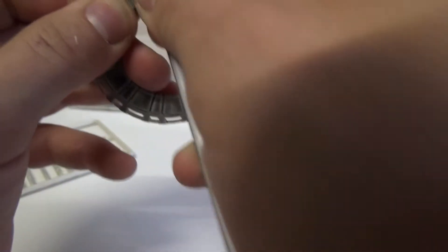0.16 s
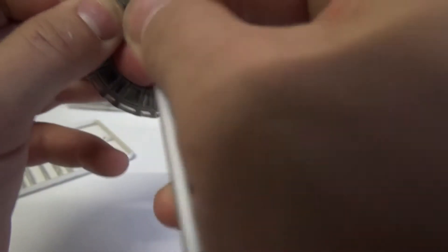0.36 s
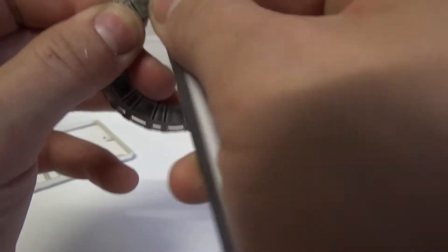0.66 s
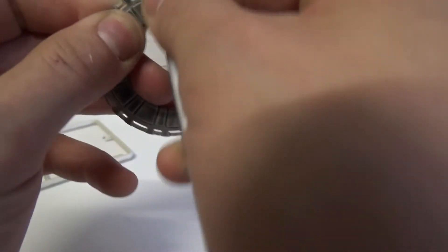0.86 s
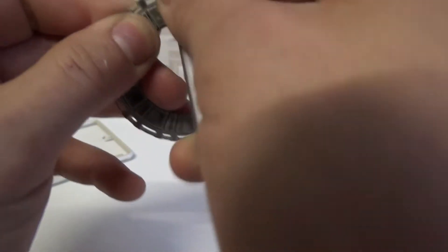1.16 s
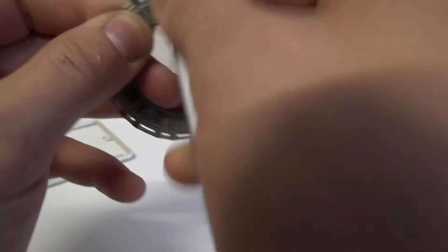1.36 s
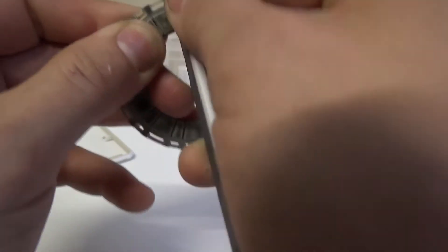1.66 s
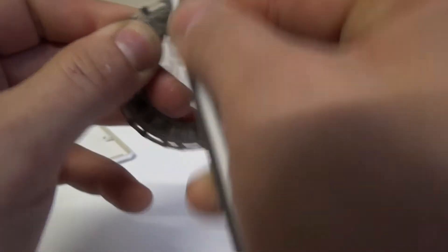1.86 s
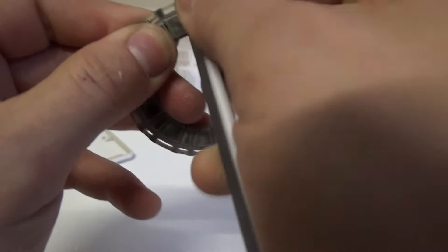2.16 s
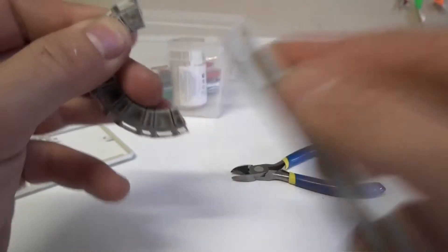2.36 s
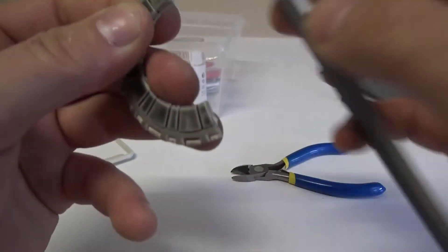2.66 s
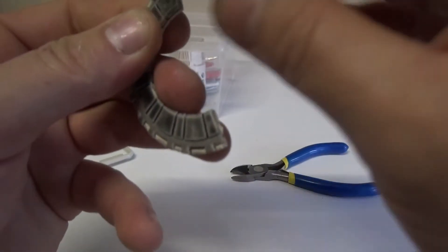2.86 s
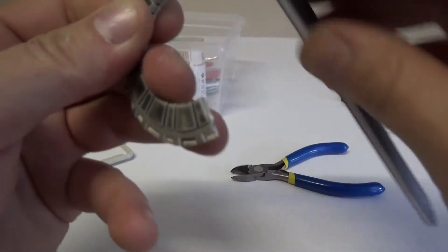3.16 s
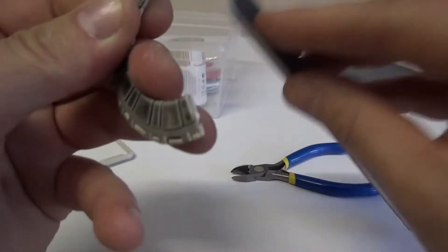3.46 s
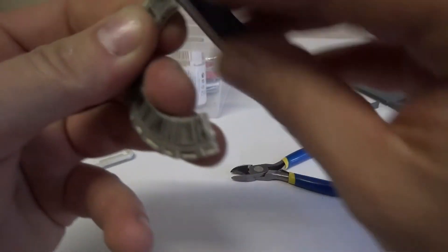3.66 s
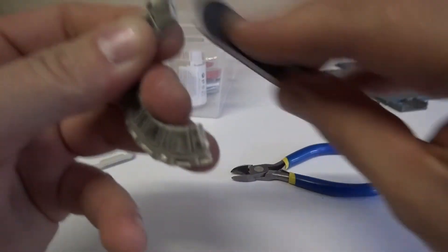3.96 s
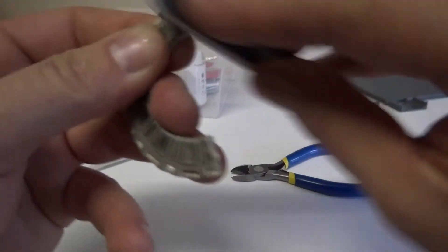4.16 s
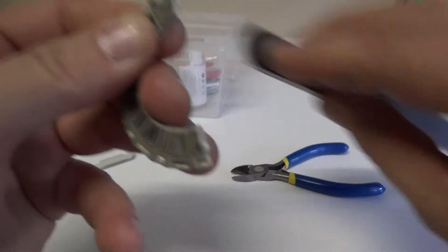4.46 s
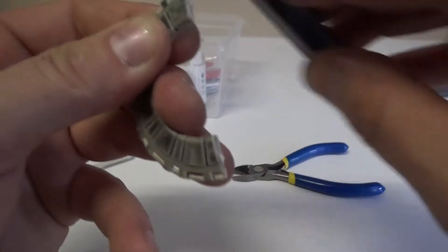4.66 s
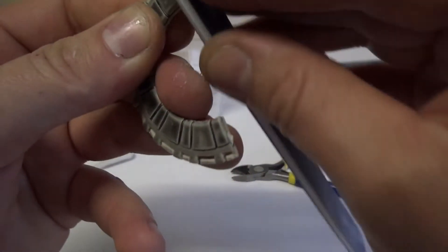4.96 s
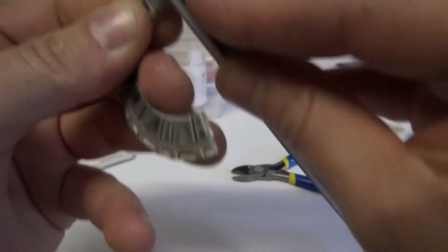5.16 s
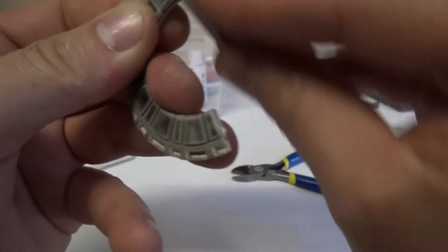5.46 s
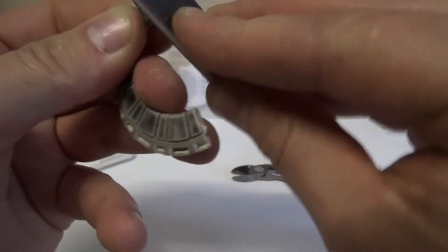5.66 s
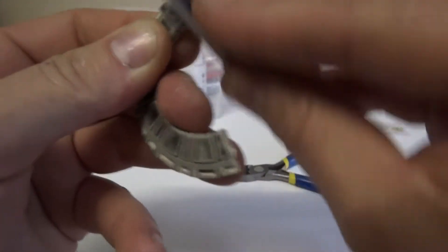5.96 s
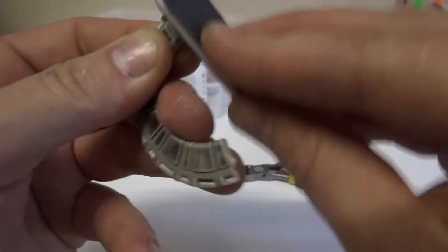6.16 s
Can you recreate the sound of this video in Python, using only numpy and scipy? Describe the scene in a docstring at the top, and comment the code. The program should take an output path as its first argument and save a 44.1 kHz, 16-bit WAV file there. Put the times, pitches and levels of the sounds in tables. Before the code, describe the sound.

A sanding stick works a small plastic model part, close to the microphone and nearly centred. In the first second the strokes are uneven, catching with sharp clicks and a brief stutter. From about 1.1 to 2.4 seconds comes a firm, coarse back-and-forth rasp, about eight strokes a second, with a few more catches. A short break follows, with only a faint rustle of fingers shifting grip. From 3 to 4.5 seconds there are six separate swipes, each landing with a dull tap, brightening quickly and snapping off the edge. Around 5 seconds a small tap starts a lighter run of quick, finely hissing strokes, with one sharp click near 5.9 seconds, lasting until about 6.3 seconds. Soft, low thuds from the arms lie under the strokes. The small room adds a short echo, a faint fan and a low electrical hum.

```python
"""A sanding stick rubs a small plastic model part held in the fingers, close to the microphone.
First come quick back-and-forth strokes, then six swipes that land with a tap and snap off the edge,
then a lighter run. Tiny breaks in the grit make stick and part ring, differently for each grip.
Fingers rustle, the arms thud softly, and a small room with a faint fan and hum echoes the work."""
import sys
import numpy as np
from scipy import signal
from scipy.fft import rfft, irfft, next_fast_len
from scipy.io import wavfile

SR = 44100
rng = np.random.default_rng(int(sys.argv[2]) if len(sys.argv) > 2 else 0)


def persist_wave(psi):
    """Save psi, clipped to +-1, as 16-bit WAV."""
    counts = np.round(np.clip(psi, -1, 1) * 32767).astype(np.int16)
    wavfile.write(sys.argv[1], SR, np.atleast_2d(counts).T)


N = 277830
TIME = np.arange(N) / SR
RING_SIZE = 2048  # samples in one ring
FREQS = np.maximum(np.arange(RING_SIZE // 2 + 1) * SR / RING_SIZE, 1)


def undb(db):
    """Turn decibels into a plain multiplier."""
    return 10 ** (np.asarray(db) / 20)


def unit(x):
    """Scale a sound to an average (rms) level of 1."""
    return x / np.sqrt(np.mean(x ** 2))


def add(track, start_s, sound):
    """Mix a sound into a track."""
    i = max(int(start_s * SR), 0)
    track[i:i + len(sound)] += sound[:max(N - i, 0)]


def colour(x, points):
    """Turn bass and treble up or down along a curve of (Hz, dB) points."""
    hz, db = np.transpose(points)
    size = next_fast_len(len(x))
    f = np.maximum(np.arange(size // 2 + 1) * SR / size, 1)
    gain = undb(np.interp(np.log(f), np.log(hz), db))
    return irfft(rfft(x, size) * gain, size)[:len(x)]


def ring(modes, scatter_db=0, detune=0):
    """An object rings after one tiny knock; the wider a tone, the sooner it dies."""
    power = 1e-9
    for (hz, width, db), (louder, higher) in zip(modes, rng.standard_normal((len(modes), 2))):
        hz = hz * (1 + detune * higher)
        distance = (FREQS - hz ** 2 / FREQS) / width
        power = power + undb(db + scatter_db * louder) ** 2 / (1 + distance ** 2 / 2) ** 2
    # make the ring follow the knock, never come before it
    cepstrum = irfft(np.log(power) / 2)
    cepstrum[1:RING_SIZE // 2] *= 2
    cepstrum[RING_SIZE // 2 + 1:] = 0
    response = irfft(np.exp(rfft(cepstrum)))
    return response / np.linalg.norm(response)


def grit(speed, grains_per_s, judder_db, judder_hz):
    """Tiny breaks come thicker at speed, and in bunches as the stick grips and slips."""
    n = len(speed)
    chance = rng.random(SR // 4)[:n]
    push, slips = rng.standard_normal((2, SR // 4))[:, :n]
    grains = (chance < grains_per_s * speed / SR) * push
    judder = np.interp(np.arange(n) / SR * judder_hz, np.arange(n), slips)
    return unit(grains * undb(judder_db * judder))


def rub(force, body):
    """The touching point moves along the stick, so the ring changes during a stroke."""
    travel = np.linspace(0, 1, len(force))
    first, last = [ring(body, scatter_db=1, detune=.02) for _ in range(2)]
    return signal.fftconvolve(force * (1 - travel), first) + signal.fftconvolve(force * travel, last)


def crack(body, decay_s, crumble):
    """One sharp release, then a brief crumble of grit."""
    t = np.arange(RING_SIZE // 4) / SR
    force = crumble * rng.standard_normal(len(t)) * np.exp(-t / decay_s)
    force[0] = 1
    sound = signal.fftconvolve(force, ring(body))
    return sound / np.linalg.norm(sound) * np.sqrt(.0002 * SR)  # the energy of a 0.2 ms pulse


def clicks(events, body, gain_db, decay_s, crumble):
    """An edge lets go of the stick: one crack for each (seconds, dB) event."""
    out = np.zeros(N)
    for start, db in events:
        add(out, start, undb(db + gain_db) * crack(body, decay_s, crumble))
    return out


# The hush of the room. Each row: frequency in Hz, relative level in dB.
AIR_TONE = [(15, -48), (25, -2), (53, 0), (71, -2.5), (86, -0.5), (107, -3.5), (129, -15), (164, -12.5),
            (331, -18.5), (421, -16), (848, -20.5), (1490, -19.5), (2360, -25.5), (11800, -32),
            (15500, -31.5)]
# The fan's whine. Each row: pitch in Hz, width in Hz, relative level in dB.
FAN_TONES = [(1143, 150, -1.5), (1450, 33, 3.5)]

def background(fan_db, hum_db):
    """Room air, a faint fan and a 100 Hz mains hum."""
    air = undb(-59.5) * unit(colour(rng.standard_normal(N), AIR_TONE))
    air = colour(air, [(30, -12), (60, -7.5), (200, 0.5)])
    fan = signal.fftconvolve(rng.standard_normal(N), ring(FAN_TONES))[:N]
    hum = np.sin(2 * np.pi * 100 * TIME)
    return air + undb(fan_db) * fan + undb(hum_db) * hum


# The tone of the echo. Each row: frequency in Hz, boost or cut in dB.
ECHO_TONE = [(100, 12.5), (300, 0.5), (1000, -1.5), (3000, 1.5), (5000, -1), (7000, -3.5), (9500, -0.5),
             (12000, -3.5), (15500, -7)]

def room_echo(x, bench_s, bench_db, low_fade_s, treble_fade_s):
    """One bounce off the bench, then a short wash from the walls whose treble dies sooner."""
    t = np.arange(SR // 2) / SR
    noise = rng.standard_normal(len(t))
    low = colour(noise, [(4000, 0), (12000, -20)])
    tail = low * undb(-60 * t / low_fade_s) + (noise - low) * undb(-60 * t / treble_fade_s)
    tail *= 1 - np.exp(-(t / 0.0036) ** 2)
    response = undb(-12.5) * colour(tail / np.linalg.norm(tail), ECHO_TONE)
    add(response, bench_s, np.array([undb(bench_db)]))
    return signal.fftconvolve(x, response)[:N]


# How wide the sound spreads. Each row: frequency in Hz, strength of the spread in dB.
STEREO_WIDTH = [(30, -25), (100, -19.5), (280, -10), (700, -15), (1800, -27), (3500, -34), (6000, -13),
                (10500, -11.5), (11500, -19.5), (15000, -41)]

def stereo_side(direct, ambient):
    """The microphone's two openings hear near sounds slightly out of step, and unlike mixes of echoes."""
    spread = rng.standard_normal(RING_SIZE) * np.linspace(1, 0, RING_SIZE)
    diffuse = signal.oaconvolve(ambient, spread / np.linalg.norm(spread))[:N]
    out_of_step = signal.hilbert(direct, next_fast_len(N)).imag[:N]
    return colour(out_of_step + diffuse, STEREO_WIDTH)


# Fingers shift their grip. Each row: time in seconds, level in dB.
FINGER_LEVELS = [(0, -67), (2.3, -57), (2.45, -66.5), (2.65, -61), (2.85, -84), (3.0, -79), (6.3, -89)]

def fingers():
    """Skin slides softly over plastic."""
    rustle = rng.standard_normal(N) * undb(4 * rng.standard_normal(N))
    rustle = unit(colour(rustle, [(300, -12), (2500, -1.5), (7000, -2.5), (15000, -5.5)]))
    return undb(np.interp(TIME, *np.transpose(FINGER_LEVELS))) * rustle


def arm_thuds(strokes, snaps, snap_db, turn_db, decay_s):
    """Every turn of the hand and every snap jolts the forearms and the bench under them."""
    jolts = np.zeros(N)
    fade = np.exp(-np.arange(SR // 2) / SR / decay_s)
    for start, _, _ in strokes:
        add(jolts, start, undb(turn_db) * fade)
    for release, db in snaps:
        add(jolts, release, undb(snap_db + db / 2) * fade)
    rumble_tone = [(15, -15), (30, -8), (44, 3.5), (70, -8), (120, -10.5), (220, -29), (1000, -66)]
    return jolts * unit(colour(rng.standard_normal(N), rumble_tone))


# A finger or the stalled stick drags without cutting.
# Each row: start in seconds, length in seconds, relative level in dB.
DRAGS = [(0, 0.17, -63.5), (0.597, 0.13, -53.5), (3.471, 0.24, -64.5)]
# The part's hollow ring, muffled by fingers. Each row: pitch in Hz, width in Hz, relative level in dB.
DRAG_RING = [(206, 80, 4.5), (446, 180, -2.5), (1400, 290, -9)]

def dragging(strokes, taps, swipes, gain_db, lead_s):
    """Slow gripping and slipping makes a dull rub, also under strokes and between tap and swipe."""
    stroke_db, resting_db = -65, -68.5
    under_strokes = [(start - lead_s, length + lead_s, stroke_db) for start, length, _ in strokes]
    before_swipes = [(tap, start - tap, resting_db) for (tap, _), (start, *_) in zip(taps, swipes)]
    out = np.zeros(N)
    for start, length, db in DRAGS + under_strokes + before_swipes:
        speed = np.hanning(int(length * SR)) ** .5
        force = speed * undb(db + gain_db) * grit(speed, grains_per_s=1500, judder_db=3.5, judder_hz=149)
        add(out, start, rub(force, DRAG_RING))
    return out


# The stick lands on the part. Each row: time in seconds, relative level in dB.
TAPS = [(2.9871, -26.5), (3.3597, -15), (3.6542, -15.5), (3.9280, -10.5), (4.181, -10), (4.4573, -13),
        (4.9730, -23)]
# The ring of that knock. Each row: pitch in Hz, width in Hz, relative level in dB.
TAP_RING = [(278, 470, 2.5), (643, 180, 6), (1330, 690, 2), (1780, 400, -6), (2550, 550, -10.5)]

def tapping(tick_body, knock_db, tick_db):
    """The soft pad spreads the blow into a dull knock, with a tick of grit on top."""
    out = np.zeros(N)
    for start, db in TAPS:
        knock = signal.lfilter(np.hanning(7), 3, ring(TAP_RING))
        add(out, start, -undb(db + knock_db) * knock)
        add(out, start, undb(db + tick_db) * crack(tick_body, decay_s=0.00041, crumble=0.18))
    return out


# The stick catches hard on an edge. Each row: time in seconds, level in dB.
HARD_CATCHES = [(.351, -24), (.4445, -18), (.598, -19.5), (.662, -17), (.721, -22), (.792, -26),
                (.994, -24), (1.3645, -13), (1.506, -25), (2.344, -16), (4.945, -37.5), (5.893, -15)]

def catching(body, stall_start_s, stall_end_s, stutters_per_s, stutter_db, fade_db_per_s):
    """The stick catches and lets go; once it stalls in an uneven stutter that fades as the hand eases."""
    beats = np.arange(stall_start_s, stall_end_s, 1 / stutters_per_s)
    late, strength = rng.random((len(beats), 2)).T
    levels = stutter_db - fade_db_per_s * (beats - stall_start_s) + (2 * strength - 1)
    stutter = list(zip(beats + .5 * late / stutters_per_s, levels))
    return clicks(HARD_CATCHES + stutter, body, gain_db=0, decay_s=0.0014, crumble=.6)


# One-way swipes. Each row: start in seconds, release in seconds, relative level in dB,
# rise time in seconds, growth over the swipe in dB, relative level of the closing snap in dB.
SWIPES = [(2.998, 3.087, -22, 0.041, -3, -10.5), (3.387, 3.444, -29, 0.0018, 20.5, -3.5),
          (3.684, 3.739, -25.5, .001, 4.5, -4.5), (3.958, 4.0108, -23, 0.0037, 0, 0.5),
          (4.211, 4.2522, -22.5, 0.0037, 3, -4), (4.475, 4.515, -23.5, .002, 6.5, 0.5)]
# The ring during a swipe. Each row: pitch in Hz, width in Hz, relative level in dB.
SWIPE_RING = [(497, 570, -11), (1310, 610, -2), (2270, 1000, -5.5), (4075, 900, -0.5), (5210, 500, -3),
              (6400, 940, 5.5), (7400, 1400, 6), (9300, 950, 0.5), (11400, 2300, 4.5), (13100, 1800, -2.5),
              (15000, 5200, -10)]

def swiping(gain_db):
    """Fast strokes start dull and raspy, then brighten as they speed up until the stick leaves the part."""
    out = np.zeros(N)
    for start, release, db, attack_s, growth_db, _ in SWIPES:
        length = release - start
        progress = np.linspace(0, 1, int(length * SR))
        contact = 1 - np.exp(-progress * length / attack_s)
        pressure = contact * undb(db + gain_db + growth_db * (progress - .5))
        force = pressure * grit(contact, grains_per_s=20000, judder_db=2, judder_hz=883)
        bright = rub(force, SWIPE_RING)
        dull = colour(bright, [(2000, 6), (6000, -2)])
        speed = np.minimum(np.arange(len(bright)) / len(progress), 1)
        add(out, start, speed * bright + (1 - speed) * dull)
    return out


# The ring of a snap. Each row: pitch in Hz, width in Hz, relative level in dB.
SNAP_RING = [(402, 500, -6), (1270, 790, -13.5), (4260, 3800, -4.5), (7670, 4800, 3.5), (11300, 5200, 1.5)]

def snapping(snaps):
    """The part rings broadly as the stick snaps off its edge."""
    return clicks(snaps, SNAP_RING, gain_db=0.5, decay_s=0.00063, crumble=0.21)


# How hard the hand presses in the even runs. Each row: time in seconds, boost or cut in dB.
HAND_EFFORT = [(1.12, -1), (1.3, 1), (1.5, 0), (2.0, -1.8), (2.25, 4), (5.4, 1.3), (5.52, 0.5), (5.64, 3.3),
               (5.85, -1), (6.25, -1)]

def even_run(start_s, cycle_s, push_pull, count):
    """List strokes in which push and pull take turns, as loud as the hand presses."""
    strokes = []
    for k in range(count):
        delay, length, db = push_pull[k % 2]
        start = start_s + k // 2 * cycle_s + delay
        strokes.append((start, length, db + np.interp(start, *np.transpose(HAND_EFFORT))))
    return strokes


def sanding(strokes, body, gain_db, bite, growth_db, hollow_db, sharpness, floor_db,
            grains_per_s, judder_db):
    """The grit bites partway into the swing; the stick speeds up, then slows to the turn."""
    full_bite_db = -29
    out = np.zeros(N)
    for start, length, db in strokes:
        progress = np.linspace(0, 1, int(length * SR))
        speed = np.abs(np.sin(np.pi * (bite + (1 - bite) * progress)))
        level = undb(db + gain_db + growth_db * (progress - .5))
        pressure = (speed ** sharpness + undb(floor_db)) * level
        sound = rub(pressure * grit(speed, grains_per_s, judder_db, judder_hz=722), body)
        # a weak stroke cuts less and sounds hollower
        low_db = hollow_db + min(0.82 * (full_bite_db - db), 2.5)
        add(out, start, colour(sound, [(1800, low_db), (4500, 0.015)]))
    return out


# Loose first light strokes. Each row: start in seconds, length in seconds, relative level in dB.
LIGHT_OPENING = [(4.986, 0.07, -52.5), (5.045, 0.038, -42.5), (5.147, 0.068, -32.5), (5.295, 0.07, -30)]
# A light push and pull. Each row: delay in seconds, length in seconds, relative level in dB.
LIGHT_PUSH_PULL = [(0, .096, -34.5), (.117, .09, -33)]
# The ring with the stick slanted. Each row: pitch in Hz, width in Hz, relative level in dB.
LIGHT_RING = [(156, 190, -15.5), (600, 620, -9), (1130, 400, -0.5), (1630, 700, -4.5), (2520, 550, -2),
              (3620, 800, -5), (4480, 1250, -4.5), (6080, 550, -1), (7350, 810, 4.5), (8800, 2100, -4.5),
              (10940, 1220, 1.5), (12300, 3000, -4), (14700, 2500, -10.5)]

def light_sanding():
    """The slanted stick skims the part with a fine, smooth hiss. Gives the sound and its strokes."""
    strokes = LIGHT_OPENING + even_run(5.403, cycle_s=.239, push_pull=LIGHT_PUSH_PULL, count=8)
    sound = sanding(strokes, LIGHT_RING, gain_db=-1.78, bite=.09, growth_db=-1, hollow_db=-4,
                    sharpness=0.23, floor_db=-32, grains_per_s=26000, judder_db=0.7)
    return sound, strokes


# Loose first firm strokes. Each row: start in seconds, length in seconds, relative level in dB.
FIRM_OPENING = [(.153, 0.075, -37), (0.327, 0.099, -36.5), (0.438, 0.12, -29), (0.617, 0.12, -38.5),
                (.871, 0.077, -29.2), (1.001, 0.095, -30.5)]
# A hard push and a softer pull. Each row: delay in seconds, length in seconds, relative level in dB.
FIRM_PUSH_PULL = [(0, 0.093, -26.5), (0.123, 0.11, -29.5)]
# The ring with the stick upright. Each row: pitch in Hz, width in Hz, relative level in dB.
FIRM_RING = [(210, 110, -6.5), (593, 310, -6.5), (1414, 530, -2.5), (1735, 514, 0.5), (3030, 920, -4.5),
             (4160, 530, -3.5), (4960, 910, -1), (6520, 1230, -1.5), (8080, 1300, -1), (10340, 1700, 1),
             (12000, 1100, 0.5), (13100, 1800, -5), (15300, 1500, -7.5)]
# The upright stick sends more sound left. Each row: frequency in Hz, strength of the lean in dB.
LEFT_LEAN = [(300, -42), (600, -21), (2000, -19.5), (10000, -26), (12000, -63)]

def firm_sanding():
    """The upright stick cuts with a coarser rasp. Gives the sound, its leftward lean and its strokes."""
    strokes = FIRM_OPENING + even_run(1.1195, cycle_s=.2503, push_pull=FIRM_PUSH_PULL, count=10)
    sound = sanding(strokes, FIRM_RING, gain_db=-1.38, bite=.14, growth_db=3, hollow_db=-1.73,
                    sharpness=0.76, floor_db=-19, grains_per_s=12000, judder_db=1.5)
    return sound, colour(sound, LEFT_LEAN), strokes


def scene():
    """The work is close and nearly straight ahead; its echo and the background spread wider."""
    firm, lean, firm_strokes = firm_sanding()
    light, light_strokes = light_sanding()
    snaps = [(release, db) for _, release, *_, db in SWIPES]
    work = firm + light + swiping(gain_db=-0.63)
    work += catching(FIRM_RING, stall_start_s=.581, stall_end_s=.81, stutters_per_s=50,
                     stutter_db=-24.5, fade_db_per_s=43)
    work += snapping(snaps)
    work += tapping(FIRM_RING, knock_db=6.5, tick_db=-13.5)
    work += dragging(firm_strokes, TAPS, SWIPES, gain_db=2, lead_s=.01)
    echo = room_echo(work, bench_s=0.0044, bench_db=-19, low_fade_s=0.32, treble_fade_s=0.27)
    quiet = fingers() + background(fan_db=-66.5, hum_db=-69.5)
    thuds = arm_thuds(firm_strokes + light_strokes, snaps, snap_db=-53.5, turn_db=-61.5, decay_s=0.087)
    mid = work + echo + quiet + thuds
    side = stereo_side(undb(-3.5) * work, undb(-2) * echo + undb(9) * quiet) + lean
    return np.array([(mid + side) * undb(0.03), (mid - side) * undb(-0.03)])


def record(dry):
    """The recorder rounds off the sharpest snaps and cuts the treble above 15800 Hz."""
    rounded = dry / (1 + (dry / .85) ** 6) ** (1 / 6)
    return signal.sosfilt(signal.ellip(10, .2, 70, 15800, fs=SR, output="sos"), rounded)


dry = scene()
out = record(dry)
persist_wave(out)
```